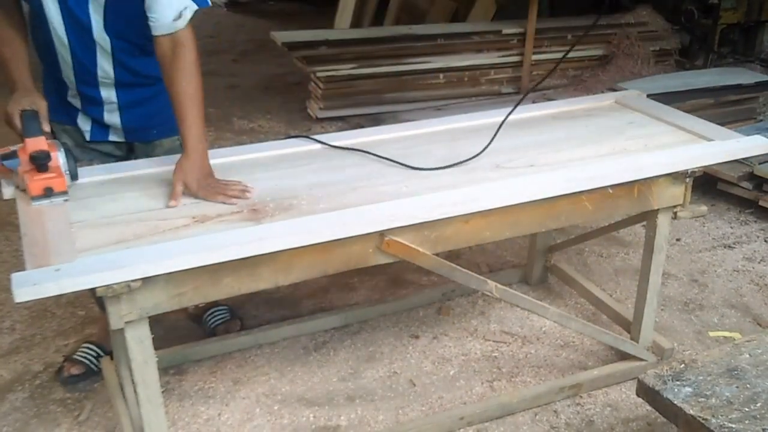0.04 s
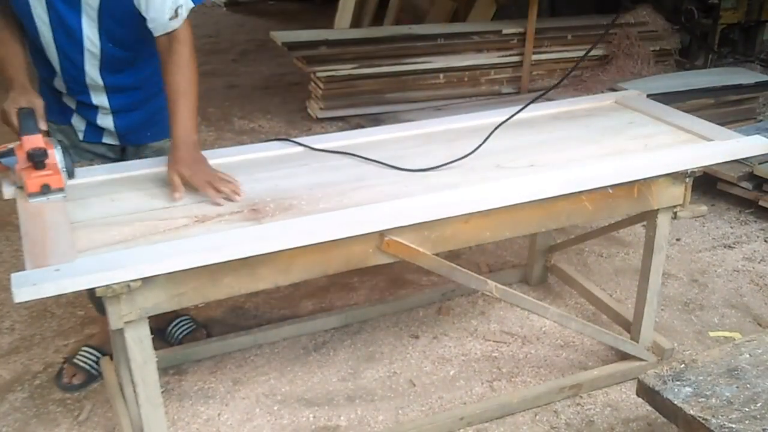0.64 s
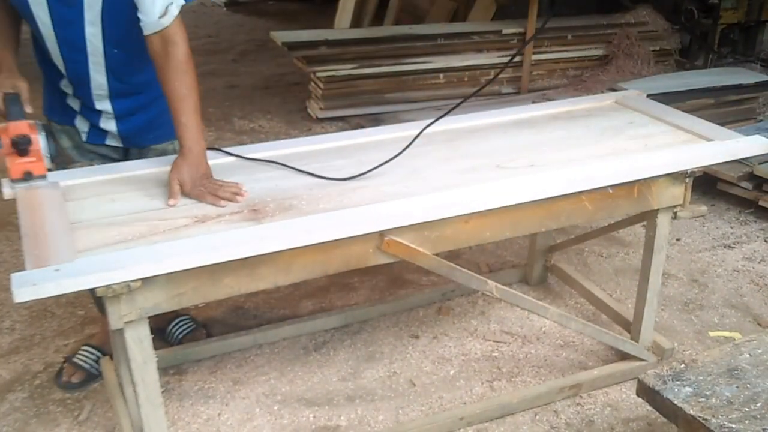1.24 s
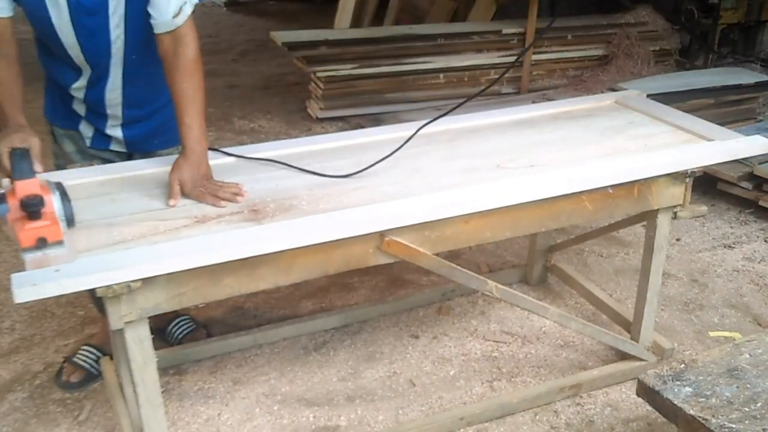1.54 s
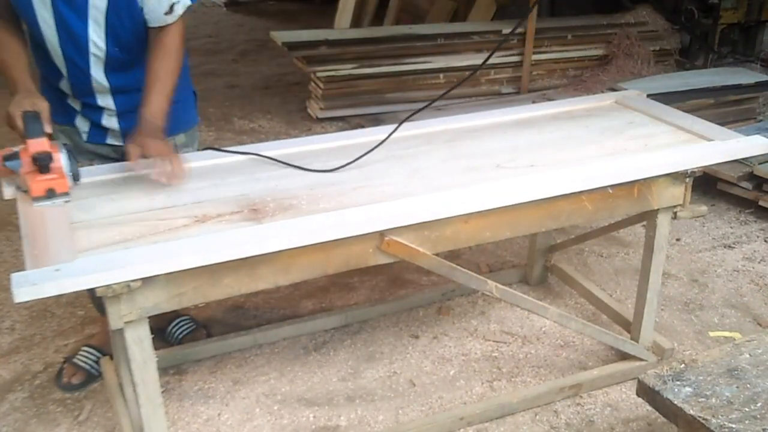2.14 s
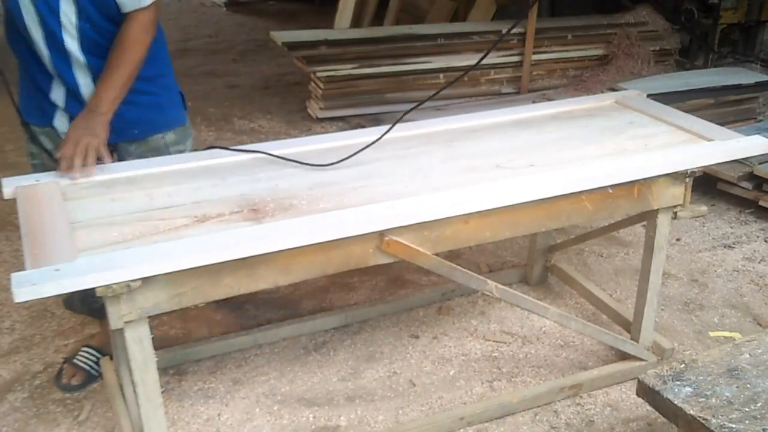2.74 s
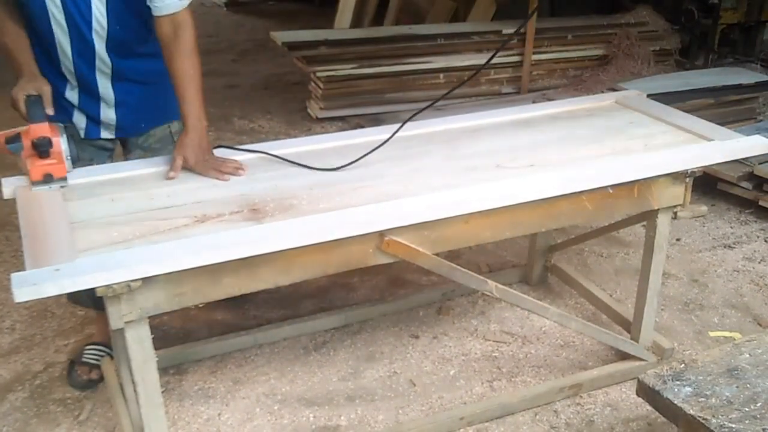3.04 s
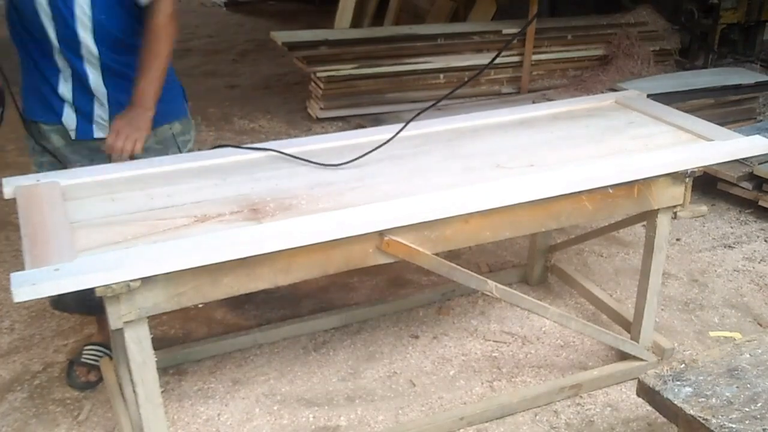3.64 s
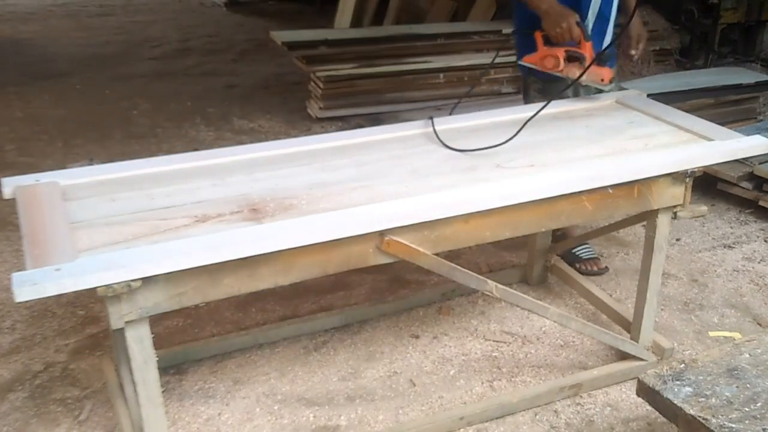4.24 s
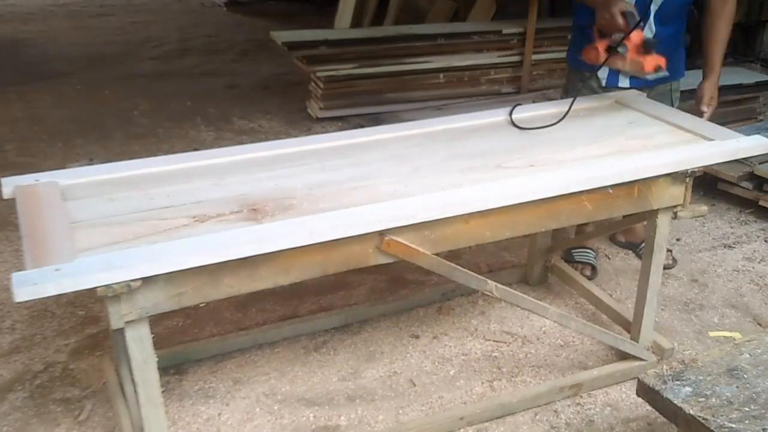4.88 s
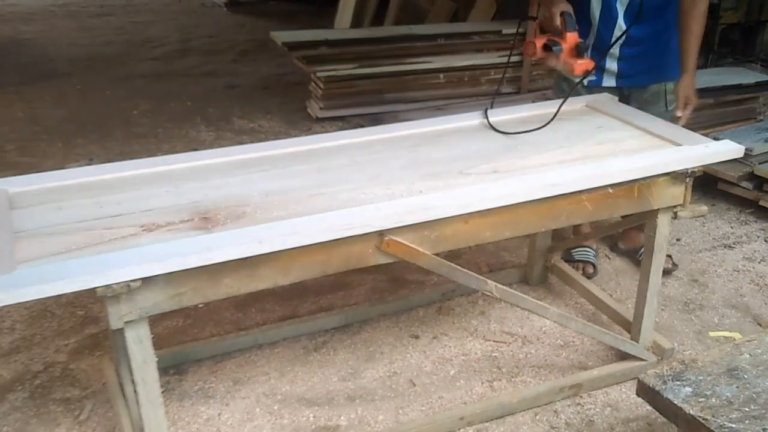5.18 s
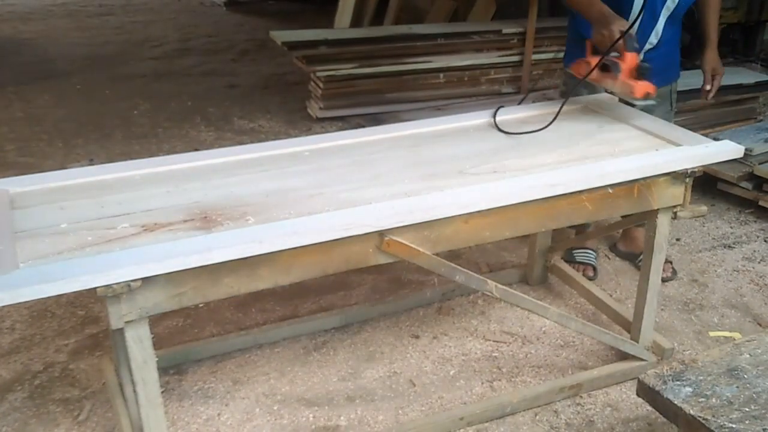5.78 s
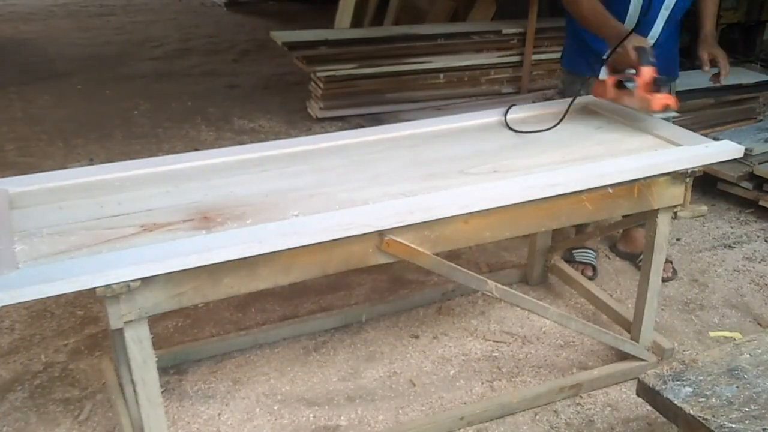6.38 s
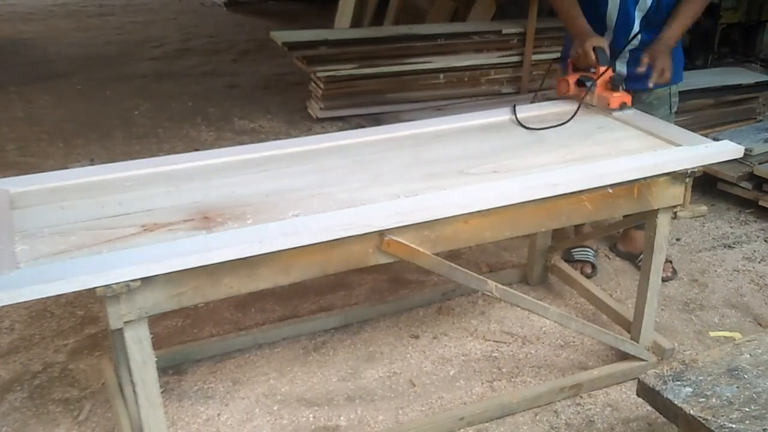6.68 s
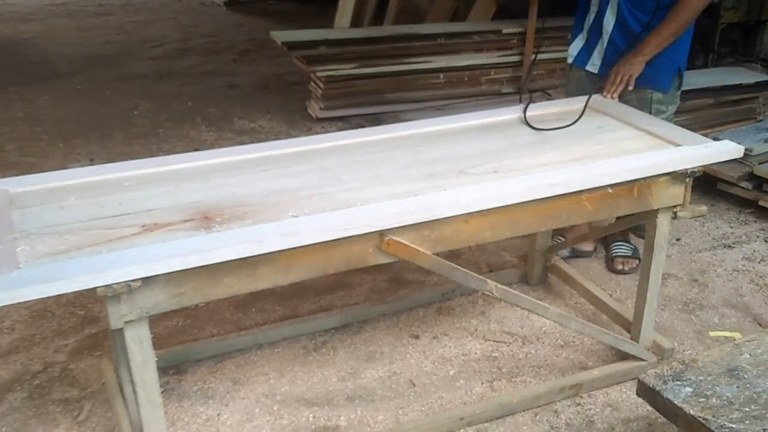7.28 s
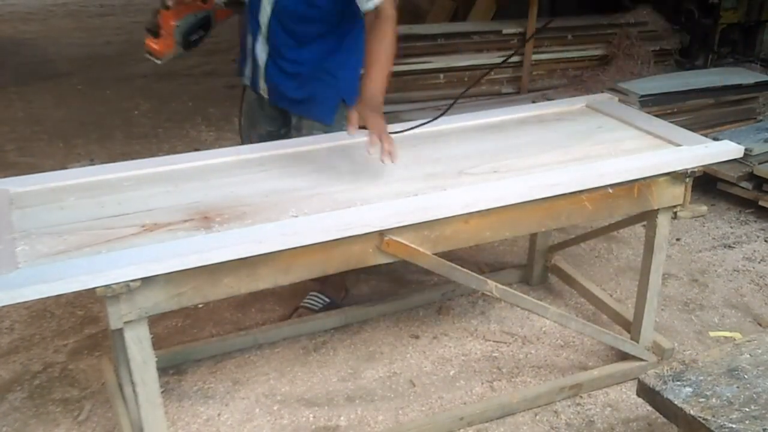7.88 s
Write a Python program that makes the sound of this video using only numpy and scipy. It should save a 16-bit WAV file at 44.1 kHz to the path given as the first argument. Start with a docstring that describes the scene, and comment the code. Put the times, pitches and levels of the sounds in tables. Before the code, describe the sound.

A power planer bites wood in quick repeated strokes, its high whine dipping and recovering over a chugging engine.

```python
"""An open-air workshop, one microphone close to a wooden door being trimmed with an electric hand planer.
In each short pass the motor sags as the knives bite and sing in the wood, and chips spray; between
passes it whines back up, or coasts when the trigger is let go. Nearby a single-cylinder engine chugs
and drives another woodworking machine, which cuts now and then farther off.
The recorder's gain control ducks the whole yard under the loud cuts."""
import sys
import numpy as np
from scipy import signal
from scipy.fft import rfft, irfft, next_fast_len
from scipy.io import wavfile
from scipy.ndimage import uniform_filter1d

SR = 44100
rng = np.random.default_rng(int(sys.argv[2]) if len(sys.argv) > 2 else 0)


def output_pcm(signal):
    """Save a mono or channel-first signal as 16-bit PCM at the path in sys.argv[1].

    Samples are clipped to [-1, 1] before scaling.
    """
    pcm = np.clip(np.atleast_2d(signal).T, -1, 1) * 32767
    wavfile.write(sys.argv[1], SR, np.round(pcm).astype(np.int16))


N = 349260
TIME = np.arange(N) / SR

# The planer, close up. Each row: start and end of a pass in seconds, seconds to full depth, loaded pitch
# in Hz, knife song in dB, its tilt in dB per order, chip spray in dB.
PLANER_PASSES = [(0.019, .262, 0.16, 1227, -2, -0.2, -34.5), (0.655, 0.97, .043, 1116, -1, -0.6, -33),
                 (1.401, 1.69, 0.07, 1128, -1, -0.2, -48), (2.118, 2.382, 0.081, 1164, 0.5, 0.4, -34),
                 (3.165, 3.301, 0.017, 1217, -3.5, 0.6, -30), (4.48, 4.759, 0.0038, 1111, -2.5, 0.4, -35.5),
                 (5.38, 5.689, .035, 1097, -1, 0.3, -34.5), (6.054, 6.309, 0.17, 1190, -3, 0.1, -48),
                 (6.691, 6.897, 0.12, 1187, -0.5, .4, -30)]
# The trigger is let go. Each row: start and end in seconds.
TRIGGER_OFF = [(2.542, 2.895), (3.493, 4.12), (4.935, 5.158), (7.049, 7.7)]
# The rotor's harmonics. Each row: order, level running free in dB, level cutting in dB.
ROTOR_HARMONICS = [(1, -58, -52), (2, -47, -44), (3, -58, -42), (4, -33.5, -26), (5, -62, -35.5),
                   (6, -38.5, -29), (7, -70, -33.5), (8, -47.5, -23.5), (9, -76, -35), (10, -54, -26),
                   (11, -72, -35), (12, -62, -27), (13, -74, -34)]
# The whine swings as the tool is moved about. Each row: time in seconds, then gain in dB for the two
# lowest orders, for the fourth and for the sixth.
WHINE_SWINGS = [(.05, -4, 2.5, 6), (.36, 2, -10, 5), (.52, 0, 5.5, -3), (1.08, 2.5, -6, -10),
                (1.18, 5.5, 4, -1), (1.32, 2.5, -2, -6), (1.72, -4, -11, -3), (1.85, 1, 7.5, -7),
                (1.96, -4, -7, -4), (2.55, 3.5, -14, -1), (3.05, 5.5, 1, 3), (3.5, 1.5, -12, -13),
                (4.38, -1.5, -2.5, 1), (4.95, -9, -8, -2), (5.34, 4.5, -2, -4), (5.78, -7, -15, 0),
                (6.05, -2, 3, -5), (6.35, -2, -10, -5), (6.62, 0, -10, 11.5), (7.05, -13, -12, -5.5)]
# The knives squeal. Each row: centre and half length in seconds, order, level in dB.
KNIFE_SQUEALS = [(0.75, 0.037, 5, -26), (2.32, 0.05, 4, -24.5), (2.35, 0.047, 5, -31),
                 (3.239, .022, 5, -19), (4.702, 0.082, 2, -29), (4.721, 0.054, 4, -21), (4.72, .05, 5, -14),
                 (5.425, 0.02, 5, -23), (5.43, .025, 7, -20), (5.62, 0.061, 6, -24),
                 (5.678, .018, 5, -16.5), (6.131, 0.062, 12, -19), (6.255, 0.026, 5, -20),
                 (6.88, 0.021, 6, -19)]
# Spectrum of rushing air and chips. Each row: frequency in Hz, relative density in dB.
RUSH_SPECTRUM = [(2550, -35), (2750, -0.5), (3020, 5.5), (3300, -1.5), (3650, 6.5), (4000, 2.5), (4700, 3),
                 (5400, 0.5), (6100, -2), (7200, -0.5), (8400, 0), (10000, -4), (12500, -7), (15500, -13)]
# The steady hiss rises and falls. Each row: time in seconds, body gain in dB, treble gain in dB.
HISS_SWELL = [(0, 1.5, 5), (.9, 0, 1.5), (1.35, 2.5, -1.5), (1.7, -3.5, -5), (2.1, 1, 4), (2.9, 2.5, 4),
              (3.8, -0.5, -1), (4.4, -0.5, -0.5), (4.85, 3, 4.5), (5.3, 0.5, 3.5), (6.0, 3, 5.5),
              (6.4, 1, -1), (7.05, -1, -4.5), (7.5, 0, 0), (7.92, 2, 2.5)]
# Short scuffs on wood. Each row: centre and half length in seconds, level in dB.
WOOD_SCUFFS = [(.39, 0.024, -22.5), (.893, 0.024, -16), (3.632, 0.021, -25), (4.21, 0.011, -36),
               (6.26, 0.025, -19.5)]

# Speed of the nearby engine. Each row: time in seconds, firings per second.
FIRING_RATE = [(0.0, 41.4), (0.37, 41.7), (0.6, 40.6), (0.86, 40.7), (1.01, 41.5), (2.25, 42.3),
               (2.56, 41.1), (2.91, 41.2), (3.11, 40.5), (4.24, 42.4), (5.49, 41.1), (6.04, 41.3),
               (6.24, 40.5), (6.81, 42.4), (7.26, 41.8), (7.52, 42.3), (7.74, 41.7), (7.92, 42.3)]
# Its loudness at the microphone. Each row: time in seconds, gain in dB.
ENGINE_GAIN = [(0, -0.5), (.9, 1), (1.25, 1), (1.6, -0.5), (2.05, -0.5), (2.4, -1.5), (2.75, 0),
               (3.4, -0.5), (4.15, 1.5), (4.5, -1), (5.2, 1), (5.6, -1), (6.0, 2), (7.0, 0), (7.92, -0.5)]
# The exhaust's harmonics. Each row: order, relative level in dB.
EXHAUST_HARMONICS = [(1, -42), (2, -35.5), (3, -35), (4, -26.5), (5, -22), (6, -11), (7, -10.5), (8, -7.5),
                     (9, -14), (10, -9.5), (11, -10.5), (12, -7.5), (13, -12.5), (14, -9), (15, -9.5),
                     (16, -6), (17, -13.5), (18, 2.5), (19, -8.5), (20, -24), (21, -14.5), (22, 0),
                     (23, -2), (24, -17), (25, -51), (26, -31), (27, -11), (28, -23)]
# The muffler holds the higher notes back. Each row: frequency in Hz, delay in seconds.
MUFFLER_DELAYS = [(230, 0.0029), (340, 0.0039), (470, 0.0018), (560, 0.00029), (620, 0.012), (700, 0.0076),
                  (780, 0.015), (870, 0.013), (950, 0.0169), (1150, 0.0173)]
# Valve and piston knocks. Each row: place in the cycle from 0 to 1, width in cycles, relative level in dB.
ENGINE_KNOCKS = [(.39, 0.083, -2.5), (.57, 0.066, -6), (.78, 0.18, -24.5)]
# Spectrum of those knocks. Each row: frequency in Hz, relative density in dB.
CLATTER_SPECTRUM = [(1000, -10.5), (1250, -11.5), (1380, -6.5), (1450, 7), (1530, 0), (1580, 7), (1640, 5),
                    (1740, -8.5), (1850, -37), (2100, -8), (2500, -30)]
# The yard's wash of noise. Each row: frequency in Hz, relative density in dB.
YARD_SPECTRUM = [(25, -15.5), (180, -17.5), (260, -5.5), (900, -3), (1050, -29.5), (1300, -11), (1650, -11),
                 (1870, -17.5), (2080, 4), (2350, 5.5), (2600, -17.5), (2900, -0.5)]

# The farther machine cuts. Each row: start and end in seconds, then drone, ringing top and rush in dB.
FAR_MACHINE_CUTS = [(.54, .71, -54, -22, -25), (2.277, 2.52, -74, -32, -29.5),
                    (3.064, 3.424, -51.5, -29, -31), (3.469, 3.625, -36, -35, -36),
                    (5.03, 5.281, -49.5, -43, -43), (5.663, 5.794, -55.5, -21.5, -37),
                    (5.867, 6.081, -47, -31.5, -34.5), (6.076, 6.26, -45.5, -22, -32)]
# Its low drone. Each row: order, relative level in dB.
FAR_DRONE_HARMONICS = [(2, 6.5), (3, 5.5), (4, -5), (5, 3), (6, 1)]
# Its ringing top. Each row: order, relative level in dB.
FAR_TOP_HARMONICS = [(5, -20), (6, -15), (7, -13.5), (8, 1), (9, -9), (10, -39)]

# Wood and tool knock together. Each row: start in seconds, level in dB, decay in seconds.
TOOL_CLACKS = [(.897, -19, 0.006), (7.522, -20, 0.0044), (7.5257, -22, 0.0081)]
# Spectrum of a clack. Each row: frequency in Hz, relative density in dB.
CLACK_SPECTRUM = [(1000, -20), (2600, -14), (3200, 1), (6000, 0), (8500, -5), (15000, -27)]

FREE_HZ = 1304   # the planer's pitch with no load
BITE_ATTACK_S, BITE_RELEASE_S = 0.014, 0.027


def from_db(db):
    """Decibels to gain."""
    return 10 ** (np.asarray(db) / 20)


def rms_one(x):
    """Scale to unit power."""
    return x / np.sqrt(np.mean(x ** 2) + 1e-20)


def in_time(rows):
    """Each column of a timed table, at every sample."""
    times, *columns = np.transpose(rows)
    return [np.interp(TIME, times, column) for column in columns]


def at_hz(rows, hz):
    """Read a table on a log-frequency axis."""
    row_hz, values = np.transpose(rows)
    return np.interp(np.log(np.maximum(hz, 1)), np.log(row_hz), values)


def turns_of(hz):
    """Cycles completed at a changing rate."""
    return np.cumsum(hz) / SR


def angle_of(turns):
    """Cycles to an angle within one turn."""
    return 2 * np.pi * (turns % 1)


def gate(start, end, attack_s, release_s):
    """Rise from the start, hold, fall after the end."""
    rise = np.clip((TIME - start) / max(attack_s, 1 / SR), 0, 1)
    fall = np.clip(1 - (TIME - end) / max(release_s, 1 / SR), 0, 1)
    return rise * fall


def bursts(rows):
    """Rounded swells. Each row: centre and half length in seconds, level in dB."""
    return sum(from_db(db) * np.exp(-np.minimum(((TIME - s) / half) ** 4, 20)) for s, half, db in rows)


def drift(hz):
    """Smooth random wandering with spread 1."""
    step = int(np.clip(SR / (12 * hz), 4, 400))
    pole = np.exp(-2 * np.pi * hz * step / SR)
    white = rng.standard_normal(N // step + 302)
    slow = rms_one(signal.lfilter([1], [1, -2 * pole, pole ** 2], white)[300:])   # once settled
    return np.interp(np.arange(N) / step, np.arange(len(slow)), slow)


def noise(spectrum, low_hz=10, high_hz=20000):
    """Coloured noise between two steep edges, at unit power."""
    size = next_fast_len(N)
    hz = np.arange(size // 2 + 1) * SR / size + 1
    edges = 1 / np.sqrt((1 + (low_hz / hz) ** 24) * (1 + (hz / high_hz) ** 24))
    shaped = rfft(rng.standard_normal(size)) * edges * from_db(at_hz(spectrum, hz))
    return rms_one(irfft(shaped, size)[:N])


def partial(turns, order, flutter_db, scatter):
    """One harmonic at the microphone: it swells and fades as reflections shift, inside a rough halo."""
    angle = angle_of(order * turns)
    tone = (1 + scatter * drift(60)) * np.sin(angle) + scatter * drift(60) * np.cos(angle)
    return rms_one(tone * from_db(flutter_db * drift(10)))


def rasp(turns, low_hz, high_hz, size=256, patterns=4):
    """Scraping that nearly repeats with each turn of a drum and slowly changes its pattern."""
    place = ((turns % 1) * size).astype(int)
    scrape = sum(rng.standard_normal(size)[place] * drift(10) for _ in range(patterns))
    band = signal.butter(2, [low_hz, high_hz], "band", fs=SR, output="sos")
    return rms_one(signal.sosfilt(band, scrape))


def motor_pitch(spin_up_s=0.105, sag_s=0.094, coast_s=0.39):
    """The rotor's inertia makes the planer's pitch lag behind the load and the trigger."""
    goal_hz, haste = np.full(N, float(FREE_HZ)), np.full(N, 1 / spin_up_s)
    for start, end, entry_s, loaded_hz, *_ in PLANER_PASSES:
        load = gate(start, end, entry_s, 0)
        goal_hz += load * (loaded_hz - FREE_HZ)
        haste += load * (1 / sag_s - 1 / spin_up_s)
    for start, end in TRIGGER_OFF:
        off = (TIME > start) & (TIME < end)
        goal_hz[off], haste[off] = 0, 1 / coast_s
    growth = np.exp(np.cumsum(haste) / SR)   # solves: change of pitch = haste * (goal - pitch)
    return (FREE_HZ + np.cumsum(goal_hz * growth * -np.expm1(-haste / SR))) / growth


def knife_squeals(turns):
    """The knives squeal briefly on single orders of the rotor."""
    squeals = 0
    for order in sorted({k for _, _, k, _ in KNIFE_SQUEALS}):
        swells = bursts([(s, half, db) for s, half, k, db in KNIFE_SQUEALS if k == order])
        squeals += swells * partial(turns, order, flutter_db=0.8, scatter=0.15)
    return squeals


def planer(strain_db_per_hz=0.0152, low_strain_db_per_hz=0.04, fade_db_per_hz=0.2, coasting_db=-7):
    """Close up, the free rotor whines mostly on even orders; biting knives add odd ones and a bright top."""
    pitch = motor_pitch()
    turns = turns_of(pitch * (1 + 0.0008 * drift(20)))
    sag_hz = FREE_HZ - pitch
    # the whine grows as the motor pulls hard, then dies away below 1106 Hz
    running_db = strain_db_per_hz * sag_hz - fade_db_per_hz * np.maximum(1106 - pitch, 0)
    coasting = sum(gate(start, end, attack_s=0.027, release_s=0.014) for start, end in TRIGGER_OFF)
    low_db, fourth_db, sixth_db = in_time(WHINE_SWINGS)
    swing_db = {1: low_db, 2: low_db, 4: fourth_db, 6: sixth_db}
    bites = np.array([gate(start, end, BITE_ATTACK_S + 0.2 * entry_s, BITE_RELEASE_S)
                      for start, end, entry_s, *_ in PLANER_PASSES])
    *_, song_db, tilt_db, _ = np.transpose(PLANER_PASSES)
    tones = 0
    for order, free_db, cutting_db in ROTOR_HARMONICS:
        # the two lowest orders gain more as the pitch sags; the others drop when the current is off
        drive_db = low_strain_db_per_hz * sag_hz if order <= 2 else coasting_db * coasting
        whine = from_db(free_db + running_db + drive_db + swing_db.get(order, 0))
        song = from_db(cutting_db + song_db + tilt_db * (order - 8)) @ bites
        tones += partial(turns, order, flutter_db=4.5, scatter=0.37) * np.hypot(whine, song)
    tones += knife_squeals(turns)
    # the knives never bite quite alike, so each drum turn (four cycles of the whine) shakes the tone
    return tones * (1 + 0.24 * rasp(turns / 4, low_hz=200, high_hz=890))


def shifting_reflections(x, depth_db, size=512):
    """Reflections lift and drop narrow stretches of the spectrum, each for a few hundredths of a second."""
    spectrum = signal.stft(x, nperseg=size)[2]
    patches = rng.standard_normal(spectrum.shape)
    for _ in range(2):
        patches = uniform_filter1d(patches, size=3, axis=0)
        patches = uniform_filter1d(patches, size=6, axis=1)
    gain = rms_one(from_db(depth_db * rms_one(patches)))
    return signal.istft(spectrum * gain, nperseg=size)[1][:N]


def chips_and_hiss():
    """Air and wood dust rush out, near and far, in uneven spurts that get coarser as the cut deepens."""
    passes = sum(from_db(db) * gate(start, end, BITE_ATTACK_S, BITE_RELEASE_S)
                 for start, end, *_, db in PLANER_PASSES)
    body_db, treble_db = in_time(HISS_SWELL)
    # Each row: envelope, then gain in dB for the low rush, the scrape and the spray.
    sources = [(from_db([body_db, body_db, treble_db]), (-40.5, -37, -40)),
               (passes, (-17, -5.5, -1.5)),
               (far_cut_envelope([db for *_, db in FAR_MACHINE_CUTS]), (-9.5, 0.5, -3)),
               (bursts(WOOD_SCUFFS), (-16.5, -5.5, -0.5))]
    band_power = sum((from_db(bands_db)[:, None] * envelope) ** 2 for envelope, bands_db in sources)
    rush, scrape, spray = np.sqrt(band_power)
    depth = np.clip((20 * np.log10(spray) + 42) / 16, 0, 1)
    crackle, surge = drift(260), drift(30)
    spurts = rms_one(from_db((1.5 + depth) * crackle + 1.74 * surge))
    hiss = rush * noise(RUSH_SPECTRUM, low_hz=2560, high_hz=4440)
    hiss += scrape * noise(RUSH_SPECTRUM, low_hz=4160, high_hz=7396)
    hiss += spray * noise(RUSH_SPECTRUM, low_hz=7630)
    return spurts * shifting_reflections(hiss, depth_db=3.5)


def engine(pop_db=-46, ring_db=-45, clatter_db=-43, ring_db_per_hz=2.6, ring_from_hz=690):
    """Nearby, each firing sends a pop through the ringing muffler; valve and piston knocks follow."""
    firing_hz, = in_time(FIRING_RATE)
    swell_db, = in_time(ENGINE_GAIN)
    turns, mean_hz = turns_of(firing_hz), firing_hz.mean()
    note_hz = np.array(EXHAUST_HARMONICS)[:, 0] * mean_hz
    lags = np.cumsum(at_hz(MUFFLER_DELAYS, note_hz)) * mean_hz   # in cycles
    notes = np.array([from_db(db + 1.6 * drift(2.3)) * np.sin(angle_of(order * turns - lag))
                      for (order, db), lag in zip(EXHAUST_HARMONICS, lags)])
    pop = from_db(pop_db) * rms_one(notes[note_hz < ring_from_hz].sum(axis=0))
    ring = from_db(ring_db) * rms_one(notes[note_hz >= ring_from_hz].sum(axis=0))
    ring *= from_db(ring_db_per_hz * (firing_hz - mean_hz) + swell_db)   # rings harder with speed
    exhaust = (pop + ring) * from_db(1.48 * drift(20))
    knocks = 0
    for place, width, db in ENGINE_KNOCKS:
        cycles_away = (turns - place + 0.5) % 1 - 0.5
        knocks += from_db(db) * np.exp(-0.5 * (cycles_away / width) ** 2)
    rattle = (knocks + 0.15) * from_db(2.34 * drift(20))
    clatter = rms_one(rattle * noise(CLATTER_SPECTRUM, low_hz=980, high_hz=2600))
    return from_db(swell_db) * (exhaust + from_db(clatter_db) * clatter)


def yard_wash(level_db=-43.5):
    """All around the microphone, the yard's noise swells with the engine that feeds it."""
    swell_db, = in_time(ENGINE_GAIN)
    return from_db(level_db + 0.37 * swell_db) * noise(YARD_SPECTRUM, high_hz=3100)


def far_cut_envelope(levels_db):
    """The farther machine's cuts rise and fall, each at its own level."""
    return sum(from_db(db) * gate(start, end, attack_s=0.047, release_s=0.047)
               for (start, end, *_), db in zip(FAR_MACHINE_CUTS, levels_db))


def far_harmonics(turns, rows):
    """A stack of harmonics, blurred on its way across the yard."""
    return sum(from_db(db) * partial(turns, order, flutter_db=4.0, scatter=0.48) for order, db in rows)


def far_cutter(strokes_per_firing=16.95, idle_drone_db=-58.5, idle_top_db=-54):
    """Farther off, a three-knife block keeps pace with the engine: it drones, rings and rasps."""
    firing_hz, = in_time(FIRING_RATE)
    turns = turns_of(strokes_per_firing * firing_hz * (1 + 0.0018 * drift(10)))
    _, _, drone_db, top_db, _ = np.transpose(FAR_MACHINE_CUTS)
    drone_level = far_cut_envelope(drone_db) + from_db(idle_drone_db)
    top_level = far_cut_envelope(top_db) + from_db(idle_top_db)
    shaft_turns = turns / 3
    scrape = from_db(6.5) * np.sqrt(drone_level * top_level) * rasp(shaft_turns, low_hz=3420, high_hz=7050)
    stutter = rms_one(from_db(3.5 * np.tanh(drift(40))))   # the ringing catches and lets go
    flare = from_db(-23) * np.exp(-((TIME - 5.122) / 0.028) ** 2)   # one brief squeal on the seventh order
    squeal = flare * np.sin(angle_of(7 * turns))
    drone = drone_level * far_harmonics(turns, FAR_DRONE_HARMONICS)
    top = top_level * far_harmonics(turns, FAR_TOP_HARMONICS)
    return drone + stutter * (top + squeal) + scrape


def clacks():
    """Wood and tool knock: dry bursts of noise that die within milliseconds."""
    envelope = sum(from_db(db) * (TIME >= start) * np.exp(-np.abs(TIME - start) / decay_s)
                   for start, db, decay_s in TOOL_CLACKS)
    return envelope * noise(CLACK_SPECTRUM, low_hz=900)


def gain_control(x, threshold_db=-29, share=0.29, attack_s=0.013, release_db_per_s=49.5):
    """The recorder takes off a share of the level above its threshold, then lets the gain creep back."""
    power = uniform_filter1d(x ** 2, size=512)
    level_db = 10 * np.log10(np.maximum(power, 1e-12))
    fall_db = release_db_per_s * TIME
    held_db = np.maximum.accumulate(level_db + fall_db, axis=-1) - fall_db
    pole = np.exp(-1 / (attack_s * SR))
    excess_db = signal.lfilter([1 - pole], [1, -pole], np.maximum(held_db - threshold_db, 0))
    return x * from_db(-share * excess_db)


def scene():
    """At the microphone, in mono: the planer in front, the yard's machines behind."""
    return (planer() + chips_and_hiss() + clacks() + far_cutter() + engine() + yard_wash())[None]


def record(dry, cutoff_hz=15600):
    """The recorder rides the gain, then cuts the top steeply."""
    lowpass = signal.ellip(12, 0.1, 90, cutoff_hz, fs=SR, output="sos")
    return signal.sosfilt(lowpass, gain_control(dry))


dry = scene()
out = record(dry)
output_pcm(out)
```